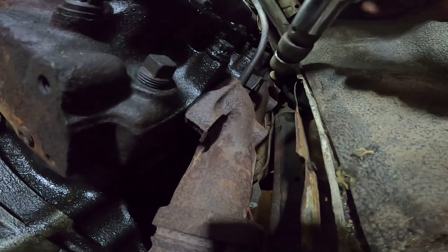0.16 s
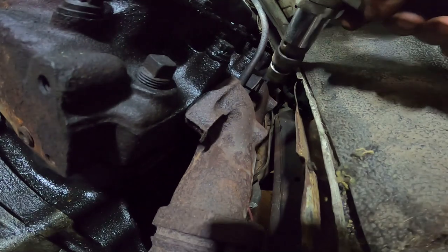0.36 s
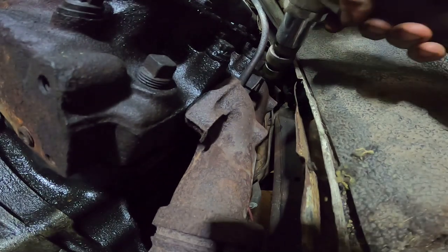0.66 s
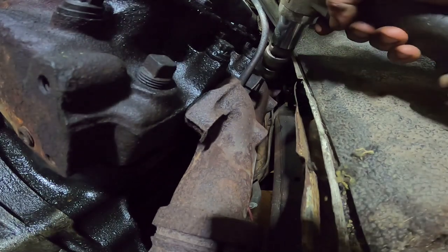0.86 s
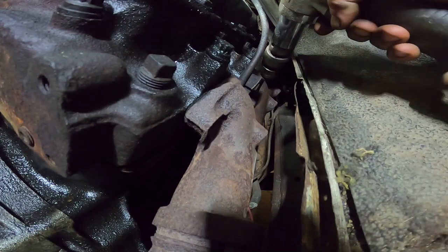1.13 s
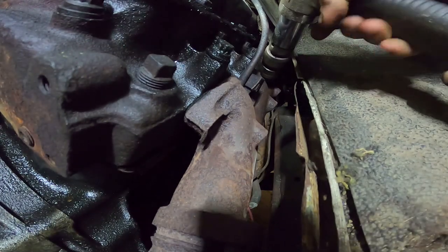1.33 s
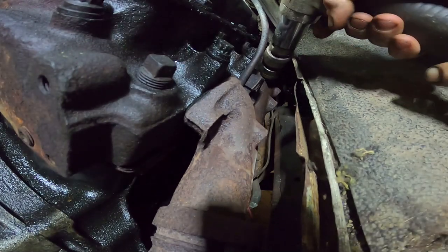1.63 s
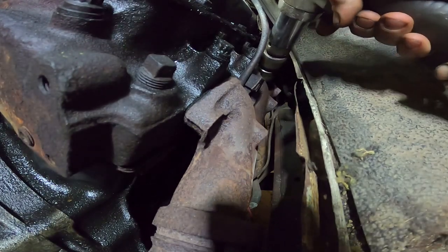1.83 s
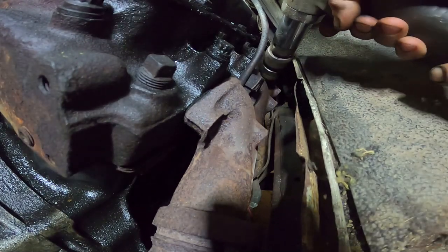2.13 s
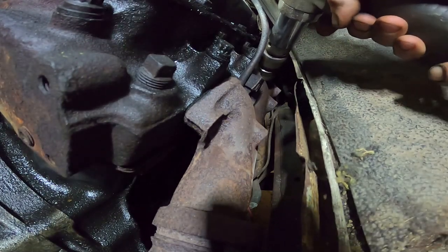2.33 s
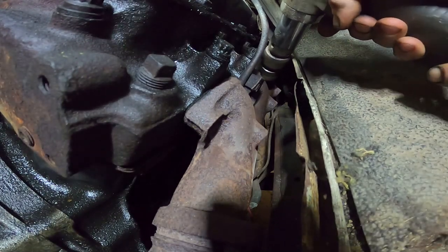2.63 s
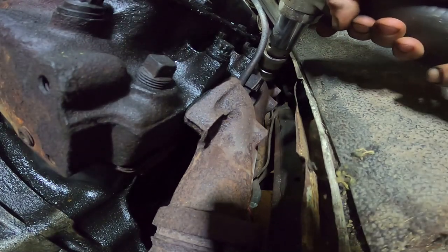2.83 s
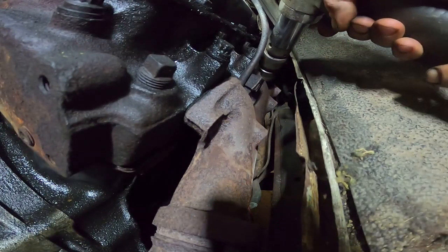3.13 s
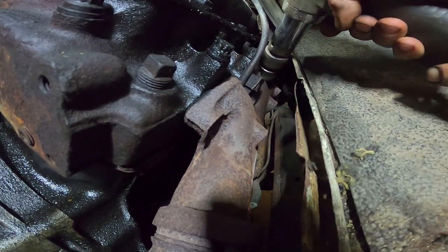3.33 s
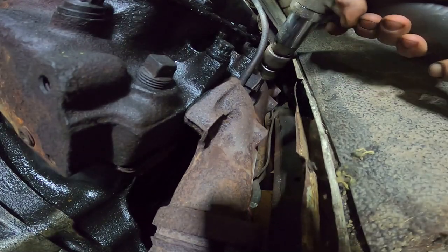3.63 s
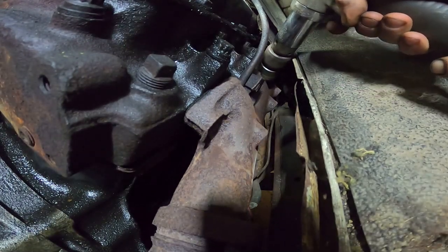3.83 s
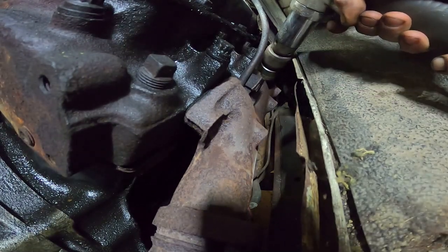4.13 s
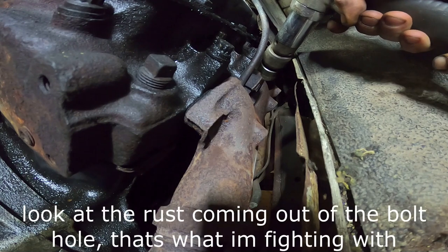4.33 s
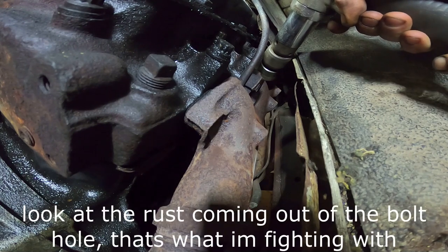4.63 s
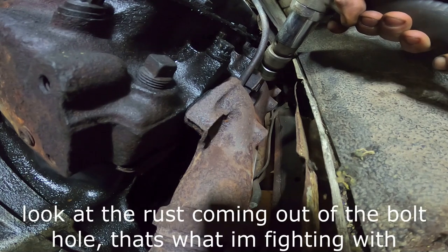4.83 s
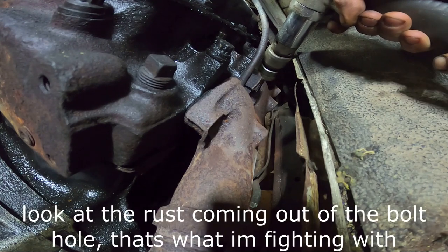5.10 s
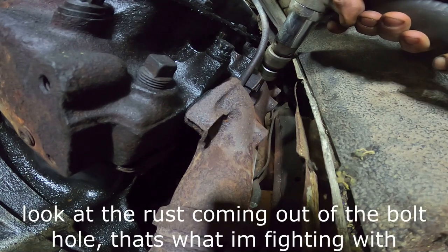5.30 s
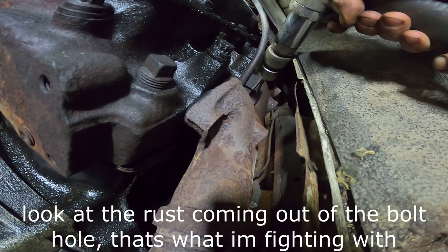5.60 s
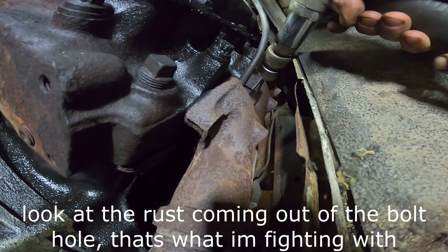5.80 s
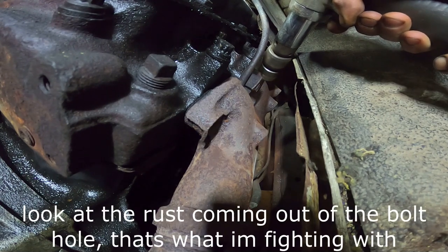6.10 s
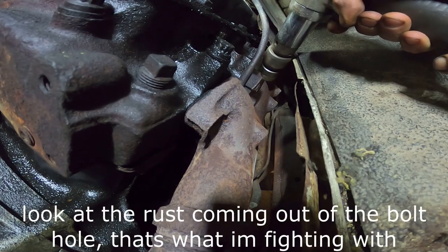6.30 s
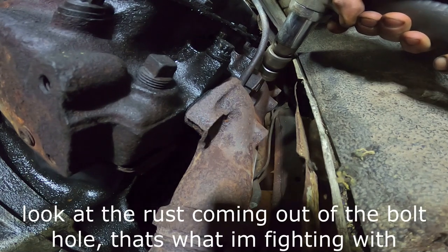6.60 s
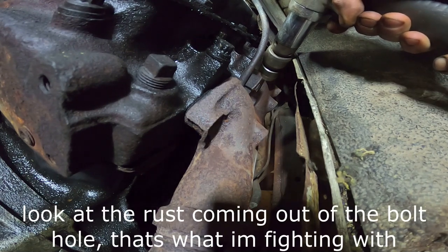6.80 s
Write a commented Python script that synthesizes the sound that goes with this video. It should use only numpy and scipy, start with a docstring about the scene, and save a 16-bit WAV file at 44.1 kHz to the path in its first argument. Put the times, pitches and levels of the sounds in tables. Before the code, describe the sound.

Close metallic knocks and gritty scrapes as a tool is set on a rusty bolt, then an air chisel hammers in a loud continuous run.

```python
"""Close knocks and gritty scrapes come first: a hand sets an air chisel on a rusted bolt under a vehicle.
Knocks are noise bursts, clinks and low thuds; scrapes are lumpy noise; behind them a faint air leak hisses.
Then the trigger is pulled: the piston thumps about thirty times a second as swinging pushes, rebounds,
rings the steel as struck modes and puffs its exhaust as coloured noise.
The image is close and nearly central, widest in the highest treble."""
import sys
import numpy as np
from scipy import signal
from scipy.fft import rfft, irfft, next_fast_len
from scipy.io import wavfile
from scipy.ndimage import uniform_filter1d

SR = 44100
rng = np.random.default_rng(int(sys.argv[2]) if len(sys.argv) > 2 else 0)


def linear_from_db(decibels):
    """Turn decibels (scalar or array-like) into linear amplitude factors; 0 gives 1."""
    return 10 ** (np.asarray(decibels, float) / 20)


def inscribe(sig):
    """Save sig as 16-bit PCM at rate SR to the path in sys.argv[1].

    A 1-D sig is mono; a 2-D sig holds one channel per row.
    Samples are clipped to [-1, 1] before scaling.
    """
    pcm = np.round(np.clip(np.atleast_2d(sig).T, -1, 1) * 32767)
    wavfile.write(sys.argv[1], SR, pcm.astype(np.int16))


N = 306495
T = np.arange(N) / SR
TRIGGER_S = 3.1718  # the valve opens

# Piston speed once it runs: t/s, blow rate f/Hz
PACE = [(3.29, 28.62), (3.462, 19.29), (3.62, 16.73), (3.757, 25.08), (3.958, 24.59), (4.103, 21.69),
        (4.295, 27.44), (4.563, 25.94), (4.764, 28.04), (5.1, 26.26), (5.334, 29.86), (5.585, 23.65),
        (5.726, 30.22), (5.94, 33.56), (6.177, 30.48), (6.402, 33.05), (6.7, 30.17), (6.895, 34.99),
        (6.96, 11.13)]
RUN_S = PACE[0][0]  # steady running starts
IDLE_PACE, USUAL_PACE = 19, 27  # blows per second: as the air comes on, and the reference for the pace laws


def pace(s):
    """Piston blows per second at the times s."""
    return np.interp(s, *np.transpose(PACE), left=IDLE_PACE)


# Lone blows as the air comes on: t/s, level/dB against a running blow
FIRST_BLOWS = [(3.216, -7), (3.2387, 1.5), (3.2653, -0.5)]
# Balance of the running tool: t/s, steel and exhaust level/dB, rebound trim level/dB, frame boom trim level/dB
DRIVE = [(3.21, -33.5, -18, 19), (3.24, -35.5, -25, -10), (3.27, -45, 5, -1), (3.29, -30.5, 0, -8),
         (3.35, -29.5, -0.5, -24), (3.62, -32.5, -1.5, -10.5), (4.1, -30.5, -0.5, -21),
         (5.15, -32, -3.5, -13), (5.3, -30.5, -4.5, -16.5), (5.55, -30.5, -2, -16),
         (5.75, -30.5, 1.5, -14.5), (6.8, -30.5, -3.5, -12), (6.95, -28.5, 3, -5.5)]
REBOUND_S, REBOUND_JITTER_S = .0117, .0002  # delay at the usual pace; slow strokes come back much later
REBOUND_POWER, CLANG_POWER = 1.75, 3.4
CLANG_LAG_S = .0007  # piston landing to bit meeting bolt at the usual pace; later in slow strokes


def strokes():
    """Blow, rebound and clang trains: after each blow the piston flies back and strikes the rear of the barrel."""
    rate = pace(T) * (T >= RUN_S)
    running = T[1:][np.diff(np.floor(np.cumsum(rate) / SR)) > 0]
    first_s, first_db = np.transpose(FIRST_BLOWS)
    s = np.r_[first_s, RUN_S, running]
    luck = rng.standard_normal((200, 3))[:len(s)]
    slowness = USUAL_PACE / pace(s)
    gain = linear_from_db(np.r_[first_db, np.zeros(len(running) + 1)] + .5 * luck[:, 0])
    back = s + REBOUND_S * slowness ** REBOUND_POWER + REBOUND_JITTER_S * luck[:, 1]
    back_gain = gain * linear_from_db(np.interp(s, *np.transpose(DRIVE)[[0, 2]]) + 0.16 * luck[:, 2])
    clang = s + CLANG_LAG_S * slowness ** CLANG_POWER * (s >= RUN_S)
    return clicks(s, gain), clicks(back, back_gain), clicks(clang, gain)


THUMP_DB, THUMP_DB_PER_PACE = -13.5, -0.0657  # gain at the usual pace; quick strokes are short and land softer
# The bit rattles in slow strokes and seats with time
CLACK_DB, CLACK_DB_PER_PACE, CLACK_DB_PER_S = -18, -1.3, -5
DULL_S, DULL_SHARE, DULL_WIDTH_S = 1.4, .7, .00025  # as the bit seats, the blow rounds off


def thump(blow, back):
    """A sharp blow, a rounder rebound, the frame booming on and the loose bit clacking."""
    pad = signal.windows.hann(160) / 80  # rust and rubber soften what enters the frame
    soft, late = play(blow + 2.1 * back, pad), play(back, pad)
    frame = ring(soft, 113.7, 28.0) + 0.23 * ring(soft, 202, 32) + 2.55 * ring(late, 319, 18.3)
    boom = linear_from_db(curve(DRIVE, 3)) * frame

    loose = play(blow, pad[::4] * 4)
    quick = pace(T) - USUAL_PACE
    clack_db = CLACK_DB + CLACK_DB_PER_PACE * quick + CLACK_DB_PER_S * (T - RUN_S)
    clack = linear_from_db(clack_db) * (ring(loose, 760, 60) + 0.25 * ring(loose, 680, 84))
    # the bit clacks once as the valve opens
    valve = play(clicks(np.array([TRIGGER_S]), np.ones(1)), pad[::10] * 10)
    clack += linear_from_db(-13) * (ring(valve, 760, 55) + .5 * ring(valve, 2450, 60))

    strike = push(blow, 325, 0.0028, 0.008, 0.32)
    dull = DULL_SHARE * np.clip((T - RUN_S) / DULL_S, 0, 1)
    blur = np.exp(-.5 * (np.arange(-100, 101) / SR / DULL_WIDTH_S) ** 2)
    strike = (1 - dull) * strike + dull * play(strike, blur / blur.sum(), 100 / SR)
    rebound = push(back, 224, 0.0023, 0.0037, 0.21)
    both = 1.377 * strike + rebound + boom + clack
    # a small body sends out no deep bass
    both = signal.sosfilt(signal.butter(2, 62, "high", fs=SR, output="sos"), both)
    return linear_from_db(THUMP_DB + THUMP_DB_PER_PACE * quick) * both


def push(train, hz, before_s, after_s, swing):
    """A short push that swings quickly up to its peak, then slows as it spreads through the frame."""
    t = np.arange(-300, 900) / SR
    turns = np.where(t < 0, hz * t, swing * (1 - np.exp(-hz * abs(t) / swing)))
    size = np.exp(np.where(t < 0, -(t / before_s) ** 2, -t / after_s))
    return play(train, -np.cos(2 * np.pi * turns) * size, 300 / SR)


# Modes of chisel, bolt and casting: f/Hz, base width f/Hz (scaled where struck), relative level/dB
STEEL = [(964, 65, -10), (1300, 85, -9), (1684, 60, -10), (2260, 60, -6), (2380, 40, -10), (2821, 35, -6),
         (2935, 30, -3), (3035, 30, -5), (3139, 30, -8), (3306, 45, -2), (3750, 43, -10), (4010, 26, -6),
         (4290, 50, -3), (4750, 80, -8), (4945, 45, -11), (5570, 23, -8), (6140, 70, -5), (6219, 30, -1),
         (7110, 22, -9), (7390, 43, -11), (8930, 180, -12), (9490, 77, -11)]
# Exhaust colour: f/Hz, filter level/dB
EXHAUST = [(290, 3), (500, -2), (1160, -10), (1630, -9.5), (1970, -10.5), (2310, -3.5), (6260, -8),
           (7400, -9.5), (8000, -20), (8900, -11.5), (9900, -13.5), (10600, -18), (15800, -31.5)]
BIT_REBOUND = .3  # share of the rebound that reaches the bit
TICK_LEAD_S, TICK_DECAY_S = 0.0019, .0012  # the valve ticks just before the thump peaks
# The unseated bit rings bright at first: gain at the trigger, then its slope; width is per filter pass
LOOSE_HZ, LOOSE_WIDTH_HZ, LOOSE_DB, LOOSE_DB_PER_S = 5900, 2200, 1.5, -5
SHANK_DB = -5  # against the struck modes


def steel(blow, back, clang):
    """The valve ticks, the bit clangs into the modes, the shank rings on, and exhaust swells, then dies away."""
    t = np.arange(-260, 3000) / SR
    lead_s = 260 / SR
    chatter = np.where(t < 0, np.exp(t / 0.0016), np.exp(-t / 0.006))
    puff = np.where(t < 0, np.exp(t / 0.0062), 0.27 * np.exp(-t / 0.0036) + 0.38 * np.exp(-t / 0.038))
    tick = np.where(t < 0, 0, np.exp(-t / TICK_DECAY_S) + 0.21 * np.exp(-t / .008))
    fresh, air = rng.standard_normal((2, N))

    scrub = rattle(clang + BIT_REBOUND * back, chatter, lead_s)
    drive = 5.2 * clang + scrub + 0.041 * fresh * (T > RUN_S)
    modes = np.zeros(N)
    for k, (hz, width, db) in enumerate(STEEL):
        modes += (-1) ** k * linear_from_db(db) * width * ring(drive, hz, 0.89 * width)

    bleed = 0.22 * air * np.clip((T - TRIGGER_S) / 0.012, 0, 1)  # air escapes between strokes too
    puffs = rattle(blow + 1.8 * clang + BIT_REBOUND * back, puff, lead_s)
    exhaust = colour(puffs + bleed, EXHAUST)
    ticks = rattle(blow + 0.48 * clang, tick, lead_s + TICK_LEAD_S)
    snap = colour(ticks, [(6000, 11), (8000, -27), (10500, -3), (13500, 25), (16000, -32)])

    bright = ring(ring(drive, LOOSE_HZ, LOOSE_WIDTH_HZ), LOOSE_HZ, LOOSE_WIDTH_HZ)
    both = linear_from_db(LOOSE_DB + LOOSE_DB_PER_S * (T - TRIGGER_S)) * evened(bright)
    both = both + evened(modes) + linear_from_db(4.0) * evened(exhaust)
    both = both + linear_from_db(SHANK_DB) * evened(shank(clang * (T >= RUN_S))) + linear_from_db(-22.0) * evened(snap)
    return linear_from_db(curve(DRIVE, 1)) * both / band(both[4 * SR:], 2000, 8000)


ALIKE, SEATING_S = .7, .2  # share of a blow's grain power that repeats; how long one seating of the bit lasts


def rattle(train, shape, lead_s):
    """Noise under shape at every click; part of it repeats from blow to blow and changes as the bit shifts."""
    grain = rng.standard_normal((round(N / SR / SEATING_S) + 2, len(shape)))
    fresh = rng.standard_normal(N)
    out, lead = np.zeros(N + len(shape)), round(lead_s * SR)
    for at in np.flatnonzero(train):
        seat, part = divmod(at / SR / SEATING_S, 1)
        turn = np.pi / 2 * part
        same = np.cos(turn) * grain[int(seat)] + np.sin(turn) * grain[int(seat) + 1]
        out[at - lead:][:len(shape)] += train[at] * shape * same
    return np.sqrt(ALIKE) * out[:N] + np.sqrt(1 - ALIKE) * fresh * play(train, shape, lead_s)


# Long rings of the bit: f/Hz, width f/Hz, relative level/dB
SHANK = [(1684, 10, -12), (2259, 5, 0), (4009, 10, -11), (5327, 6, -7)]


def shank(clang):
    """Each clang stops the long rings of the bit and starts them afresh."""
    last = np.maximum.accumulate(np.where(clang > 0, T, 0))
    since = T - last
    rings = np.zeros(N)
    for hz, width, db in SHANK:
        rings += linear_from_db(db) * np.exp(-np.pi * width * since) * np.sin(2 * np.pi * hz * since)
    return (last > 0) * rings


# Knocks by hand, and two thuds as the piston starts (3.209, 3.26):
# t/s, crack level/dB, thud level/dB, thud f/Hz, clink f/Hz
KNOCKS = [(0.001, -18, -10.5, 502, 950), (0.024, -35, -18, 500, 3770), (0.032, -35, -42, 500, 3530),
          (0.058, -16.5, -14, 316, 1160), (0.072, -21.5, -8.5, 515, 980), (0.087, -24.5, -17, 392, 3700),
          (0.103, -27.5, -20, 554, 2620), (0.117, -37, -40, 510, 3430), (0.127, -22, -20.5, 510, 890),
          (0.264, -32.5, -43, 178, 2960), (0.279, -29, -36, 300, 2720), (0.381, -26.5, -15.5, 144, 940),
          (0.416, -18.5, -18.5, 283, 3760), (0.436, -27.5, -23, 410, 905), (0.51, -31, -49, 239, 1510),
          (0.579, -31, -38, 400, 870), (0.59, -26.5, -49, 312, 2380), (0.596, -24.5, -32, 190, 3650),
          (0.632, -31.5, -31.5, 131.5, 6900), (0.654, -31, -32, 405, 930), (0.661, -30.5, -36, 254, 745),
          (0.757, -32, -30, 570, 2930), (0.788, -28.5, -50, 520, 1090), (0.802, -25.5, -47, 204, 657),
          (0.838, -32, -42, 175, 1080), (1.033, -23, -30, 563, 1340), (1.046, -26.5, -32, 354, 2480),
          (1.163, -33.5, -40, 330, 1330), (1.344, -32, -27.5, 288, 1520), (1.889, -35.5, -39.5, 141, 1730),
          (2.025, -36, -49, 240, 1050), (2.03, -29, -56, 300, 6850), (2.033, -33.5, -32, 298, 3770),
          (2.048, -27.5, -24.5, 171, 1260), (2.153, -22.5, -39, 400, 1490), (2.155, -27.5, -47, 400, 6000),
          (2.157, -29.5, -26, 289, 3200), (2.326, -43, -26, 694, 4000), (2.332, -12.5, -32, 390, 1564),
          (2.341, -48, -14, 183, 2420), (2.549, -30.5, -28.5, 157.5, 1540), (2.559, -25, -27, 215, 1780),
          (2.775, -45, -40, 137, 3300), (2.942, -41.5, -36, 181, 1130), (2.982, -40.5, -34, 350, 1370),
          (2.986, -36, -42, 350, 3340), (3.209, -26, -10.5, 294, 2090), (3.26, -25, -28, 190, 680)]
# What the knocks ring in the body: f/Hz, level/dB, ring length t/s (the mode width is 3.4 over this)
BODY = [(199, -6, 0.25), (290, -6, 0.14), (411, -5, 0.08), (520, -3, .2), (760, -4, .25), (1052, -6, 0.25),
        (1300, -5, .25), (1523, -7, 0.3), (1900, -12, .2), (2250, -9, 0.2), (3042, -20, 0.14)]
# Colour of steel on rust, dragged or knocked: f/Hz, filter level/dB
SCRAPE = [(240, -6), (400, -2.5), (887, -8.5), (1550, -8.5), (2050, -9.5), (4200, -13.5), (6000, -25.5),
          (12000, -35), (15600, -65), (22000, -120)]
CRACK_S = 0.065  # decay scale: the crack's rasp falls 75 dB in this time
THUD_T60_S, THUD_CYCLES, THUD_RISE_S = 0.015, 34, 0.00061  # a deep thud lasts longer
CLINK_WIDTH = .18  # share of the clink's pitch, per filter pass


def knocks():
    """Each knock: a dull crack, a clink, a low uneven thud, and the body ringing after."""
    t, out, shove = np.arange(8000) / SR, np.zeros(N), np.zeros(N)
    rise = 1 - np.exp(-(t / 0.00095) ** 2)
    for s, db, thud_db, thud_hz, clink_hz in KNOCKS:
        thud_t60 = THUD_T60_S + THUD_CYCLES / thud_hz
        grit, at = rng.standard_normal((3, len(t))), round(s * SR)
        rasp = evened(colour(grit[0], SCRAPE))
        linger = evened(signal.lfilter([1], [1, -1.6, .64], rasp))  # the treble dies first
        crack = rise * (rasp * linear_from_db(-75 * t / CRACK_S) + 0.33 * linger * linear_from_db(-300 * t))

        width = CLINK_WIDTH * clink_hz
        clink = ring(ring(grit[1] * rise * linear_from_db(-110 * t / CRACK_S), clink_hz, width), clink_hz, width)

        # radians the thud strays from a pure tone
        wobble = 0.4 * evened(uniform_filter1d(uniform_filter1d(grit[2], 300), 300))
        tone = np.sin(2 * np.pi * thud_hz * t + wobble - wobble[0])
        thud = tone * (1 - np.exp(-t / THUD_RISE_S)) * linear_from_db(thud_db - 60 * t / thud_t60)

        out[at:at + len(t)] += linear_from_db(db) * (0.63 * crack + 0.95 * clink / abs(clink).max()) + thud
        shove[at:at + len(t)] += linear_from_db(db) * grit[0] * rise * linear_from_db(-300 * t / CRACK_S)
    # the hand damps the steel
    tool = sum(linear_from_db(db) * ring(shove, hz, 2.6 * width) for hz, width, db in STEEL[3::2])
    body = sum(linear_from_db(db) * ring(shove, hz, 3.4 / length) for hz, db, length in BODY)
    return out + linear_from_db(-28) * tool + linear_from_db(-28) * body


# Rumble colour: f/Hz, filter level/dB
RUMBLE = [(20, -30), (40, 4), (85, -5.5), (150, -1), (300, -5.5), (520, -8.5), (900, -49), (2000, -90)]
# The tool slips on rust: peak t/s, swell t/s, fade t/s, scrape level/dB, rumble level/dB
SLIPS = [(.001, 0.011, 0.17, -38, -42), (.2, 0.044, 0.056, -52, -33.5), (.29, 0.25, 0.27, -39.5, -67),
         (0.698, 0.83, 0.0063, -48.5, -41.5), (.83, 0.11, 0.064, -35.5, -39),
         (1.011, 0.2, 0.19, -42.5, -30.5), (1.71, 0.14, 0.043, -44, -46),
         (2.144, 0.0083, 0.055, -35, -26.5), (2.323, 0.02, 0.14, -34.5, -22)]
# Steady rumble of the hand: t/s, level/dB
HAND = [(0, -36), (.55, -42), (1.2, -44), (1.45, -47), (2.0, -46.5), (2.6, -50), (3.12, -48.5), (3.25, -49)]
SLIP_DB, RUMBLE_LAG_S = -23.5, 0.024  # fall over one swell or fade; the rumble comes late
HAND_SCRAPE_DB = -37  # the hand's grit against its rumble


def drag():
    """Lumpy rumble and gritty scrape of steel moved over rust."""
    lumps = linear_from_db(2.4 * np.clip(evened(uniform_filter1d(rng.standard_normal(N), 700)), -2, 2))
    sizes = linear_from_db(0.47 * np.minimum(rng.exponential(1, N), 3))
    grit = sizes * (rng.random(N) < .1) * rng.standard_normal(N)
    rumble = evened(colour(lumps * rng.standard_normal(N), RUMBLE))
    scrape = evened(colour(lumps * grit, SCRAPE))
    low = linear_from_db(curve(HAND, 1))
    high = low * linear_from_db(HAND_SCRAPE_DB)
    for s, swell, fade, scrape_db, rumble_db in SLIPS:
        late = T - s - RUMBLE_LAG_S
        high = high + linear_from_db(scrape_db + SLIP_DB * np.maximum((s - T) / swell, (T - s) / fade))
        low = low + linear_from_db(rumble_db + SLIP_DB * np.maximum(-late / swell, late / fade))
    return low * rumble + high * scrape


# Colour of shop hum and air leak: f/Hz, filter level/dB
LEAK = [(24, -42), (40, 0.5), (158, 4), (400, -13), (889, -14.5), (1580, -14), (3300, -17), (5400, -23.5),
        (6300, -13.5), (7500, -19), (8300, -20), (9600, -16), (11000, -28), (12500, -20), (15800, -30)]
# Hiss, as rms between 5.5 and 15 kHz: t/s, level/dB
LEAK_DB = [(0, -55), (.9, -54), (1.65, -53.5), (1.8, -56.5), (2.9, -58.5), (3.2, -61.5)]
# Bands that come and go in the leak: f/Hz, nominal width f/Hz, level/dB, from t/s, to t/s
WHISTLES = [(6560, 130, -60.5, 1.73, 3.0), (7820, 100, -67, 1.7, 3.0), (12700, 270, -63, 1.75, 3.0),
            (9640, 250, -63, 0.84, 1.5), (12400, 250, -66, 0.33, .85)]


def leak():
    """Patchy hiss over a low hum, with fuzzy whistling bands, all from filtered noise."""
    air = rng.standard_normal((2, N))
    drift = linear_from_db(1.5 * evened(uniform_filter1d(rng.standard_normal((2, N)), 3000)))  # the leak wavers
    air = air * drift
    z = signal.stft(air[0], nperseg=512)[2]
    patches = uniform_filter1d(rng.standard_normal(z.shape), size=3, axis=0)
    patches = evened(uniform_filter1d(patches, size=70, axis=1))
    hiss = colour(signal.istft(z * linear_from_db(2.2 * patches), nperseg=512)[1][:N], LEAK)
    bands = np.zeros(N)
    for hz, width, db, start, stop in WHISTLES:
        gate = np.clip(10 * np.minimum(T - start, stop - T) + .5, 0, 1)
        bands += linear_from_db(db) * gate * evened(ring(ring(air[1], hz, 2 * width), hz, 2 * width))
    return linear_from_db(curve(LEAK_DB, 1)) * hiss / band(hiss, 5500, 15000) + bands


def shop(x, t60=0.24):
    """A short diffuse tail of decaying noise, weighted away from the treble."""
    t = np.arange(SR // 2) / SR
    tail = signal.lfilter([1], [1, -.6], rng.standard_normal(len(t))) * linear_from_db(-60 * t / t60) * (t > .004)
    return play(x, tail / np.linalg.norm(tail))


def evened(x):
    """Scales to rms 1."""
    return x / np.sqrt(np.mean(x ** 2) + 1e-20)


def curve(rows, column):
    """One column of a table at every sample."""
    return np.interp(T, *np.transpose(rows)[[0, column]])


def colour(x, points):
    """Filters by a spectrum of (Hz, dB) points."""
    size = next_fast_len(len(x))
    f, db = np.transpose(points)
    hz = np.arange(size // 2 + 1) * SR / size
    gain = linear_from_db(np.interp(np.log(hz + 1), np.log(f + 1), db))
    return irfft(rfft(x, size) * gain, size)[:len(x)]


def ring(x, hz, width):
    """One mode struck by x; a unit click starts a decaying sine of unit size."""
    r, w = np.exp(-np.pi * width / SR), 2 * np.pi * hz / SR
    return signal.lfilter([0, r * np.sin(w)], [1, -2 * r * np.cos(w), r * r], x)


def clicks(s, gain):
    """A train of single samples."""
    at = np.round(s * SR).astype(int)
    return np.bincount(at[at < N], gain[at < N], N)


def play(train, shape, lead_s=0):
    """Sets shape at every click, begun lead_s early."""
    return signal.oaconvolve(train, shape)[round(lead_s * SR):][:N]


def band(x, lo_hz, hi_hz):
    """Rms of one band."""
    return np.std(signal.sosfilt(signal.butter(4, [lo_hz, hi_hz], "band", fs=SR, output="sos"), x))


# Colour of the side signal: f/Hz, filter level/dB
WIDE = [(60, -36), (300, -39), (800, -31), (3000, -21), (10000, -12), (12000, 1.5), (16000, 1)]


def scene():
    """All sources, then the two microphone ports."""
    blow, back, clang = strokes()
    taps, metal = knocks(), steel(blow, back, clang)
    tails = linear_from_db(-15) * shop(taps) + linear_from_db(-12.5) * shop(metal)
    mid = taps + metal + thump(blow, back) + tails + drag() + leak()
    flutter = evened(uniform_filter1d(rng.standard_normal(N), 100))  # the ports differ from moment to moment
    top = colour(mid, [(10500, -40), (12000, 4.5)])  # reaches the right port more strongly
    side = colour(0.5 * flutter * mid - 0.3 * top, WIDE)
    return np.array([mid + side, mid - side])


def low_pass(x):
    """Removes everything above the highest recorded frequency."""
    return signal.sosfilt(signal.butter(12, 15930, fs=SR, output="sos"), x)


def record(dry):
    """The deepest bass is thinned and everything above 15.9 kHz is filtered off; the level dips and fades back."""
    gap_s, hold_s, back_s = 2.967, .008, .012  # the level dips to a tenth for an instant
    fade = np.interp(T - gap_s, [-.001, 0, hold_s, hold_s + back_s], [1, .1, .1, 1])
    thin = signal.sosfilt(signal.butter(1, 45, "high", fs=SR, output="sos"), dry)
    thin = signal.oaconvolve(thin, signal.firwin(255, 15900, fs=SR)[None], "same")
    return low_pass(thin * fade)


dry = scene()
out = record(dry)
inscribe(out)
```